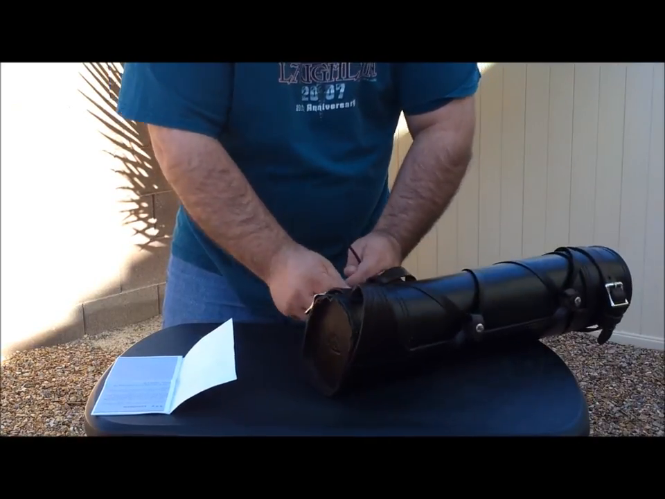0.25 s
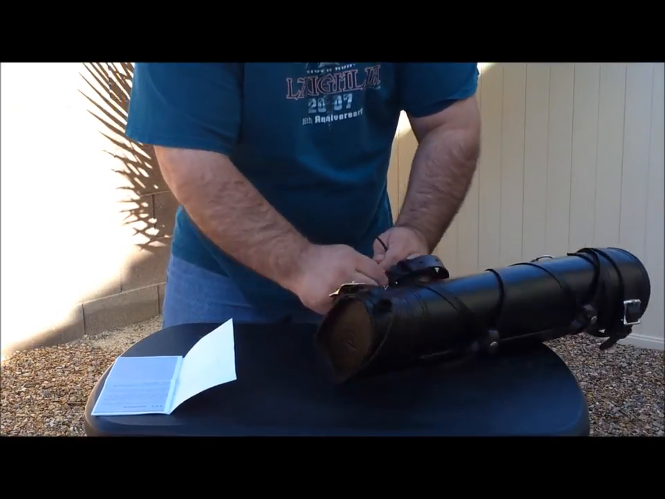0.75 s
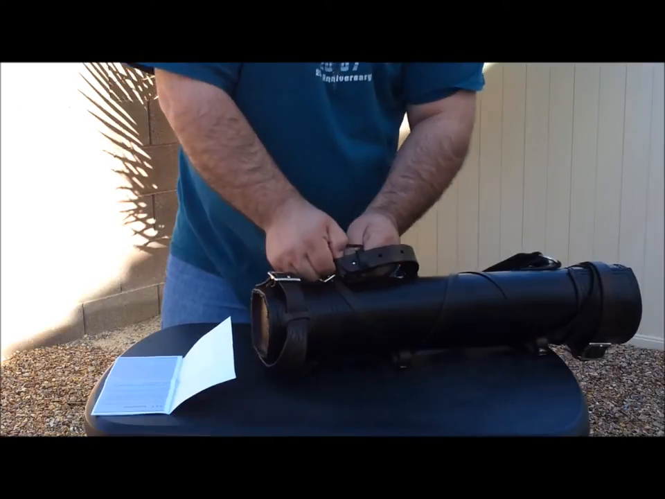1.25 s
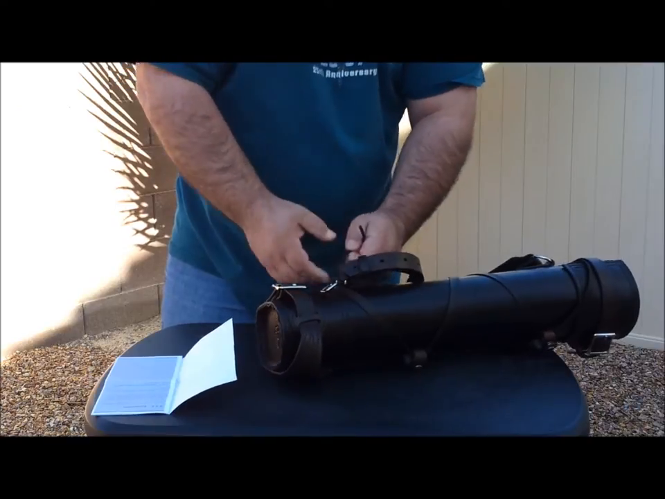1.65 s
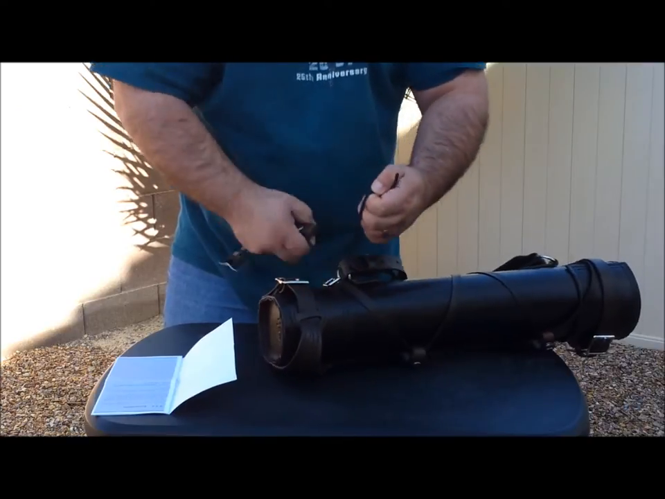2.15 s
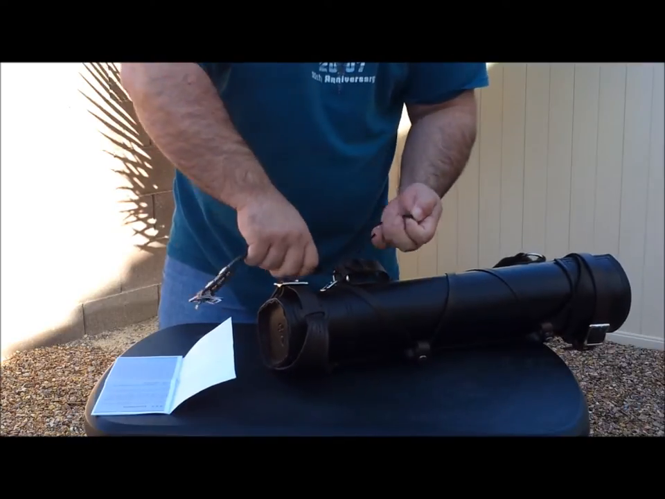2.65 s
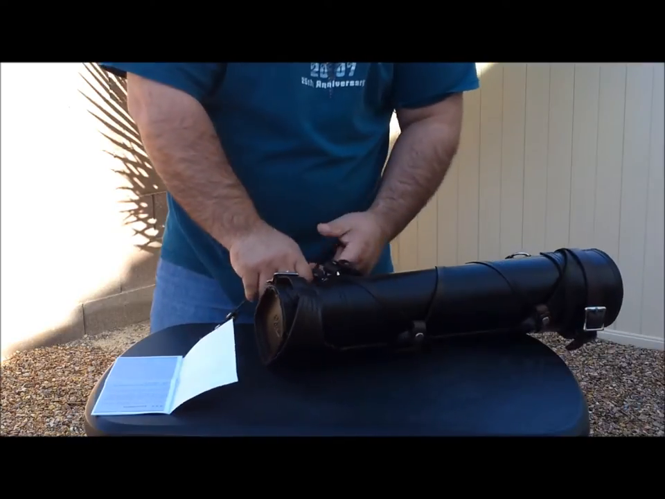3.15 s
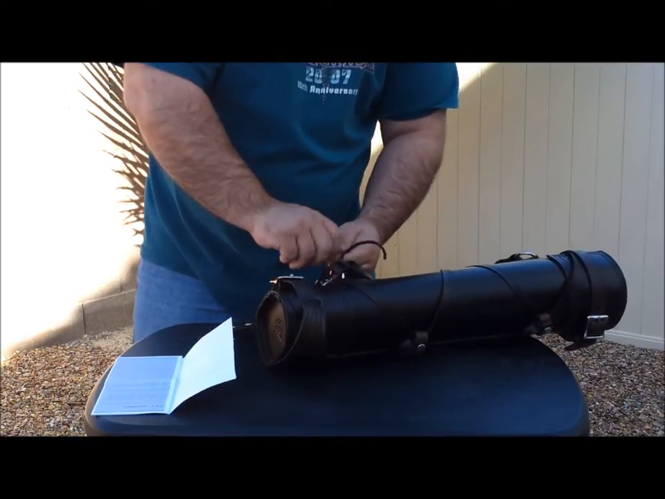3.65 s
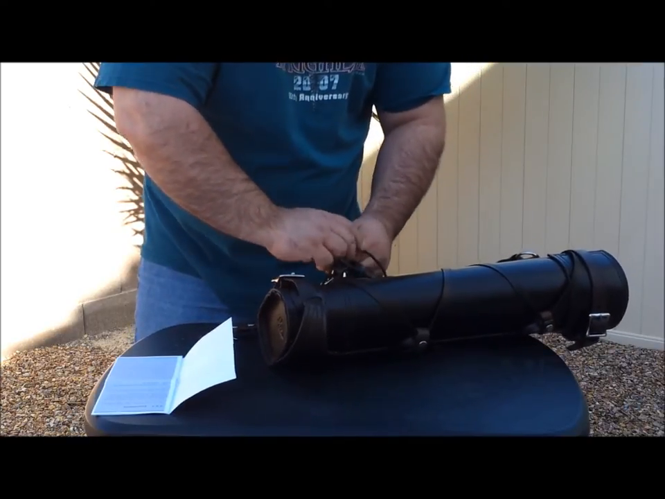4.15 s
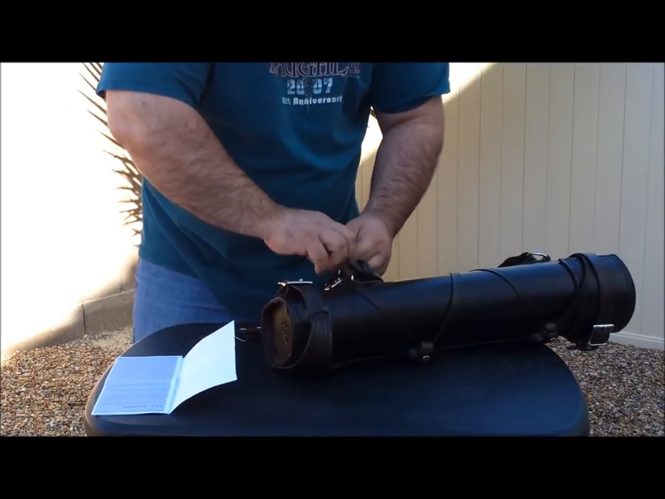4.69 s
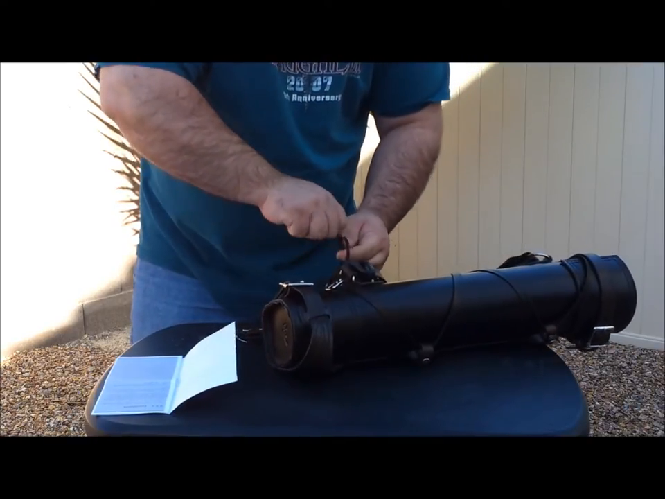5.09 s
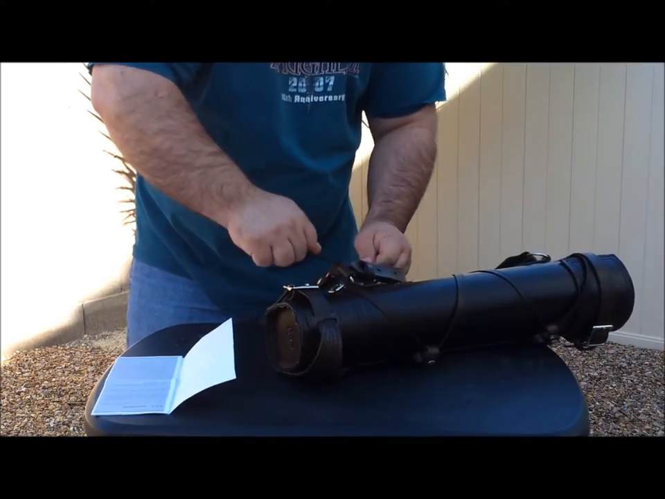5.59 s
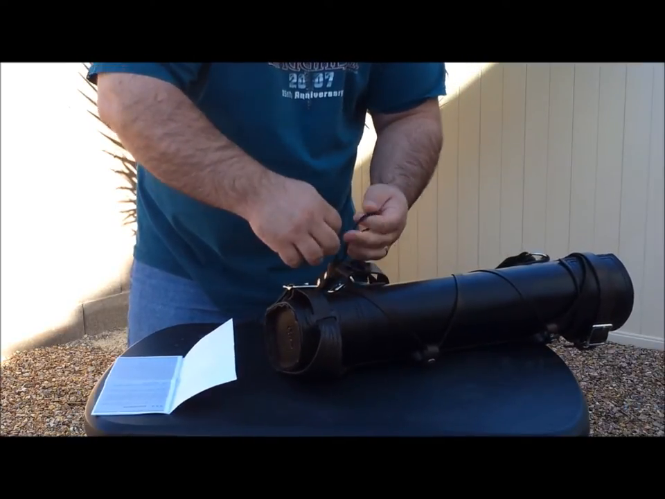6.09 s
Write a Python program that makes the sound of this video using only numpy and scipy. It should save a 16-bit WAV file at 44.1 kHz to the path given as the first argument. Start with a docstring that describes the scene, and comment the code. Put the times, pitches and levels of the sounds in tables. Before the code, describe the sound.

A faint low rumble and fine hiss continue throughout, outdoors. From about 0.3 seconds, hands rub a strap against a leather case in soft, uneven strokes, with a cluster of small ticks around 1 second. Just after 2 seconds a steel buckle knocks on the case with a bright clink, followed by more rustling. Near 3 seconds the buckle drops onto a hollow table with a sharp clatter, then scrapes and tinkles across it in short pulls until about 3.8 seconds. Quieter rubbing follows, with a few ticks around 4.6 seconds. At about 5.3 seconds the leather slides again and the buckle clatters against the case's end cap, then drags with a gritty scrape and light clinks until 5.8 seconds. A last faint rub comes at 6 seconds. The handling sounds close, with a very short echo from a wall.

```python
"""A low outdoor rumble and fine hiss, then leather rustling and ticking as a strap is threaded and tied
on a tube-shaped leather case. Its steel buckle knocks on the case, drops on the table, drags, clinks
and hits the end cap. Sliding makes friction noise; blows ring the modes of the struck part.
A yard wall answers briefly."""
import sys
import numpy as np
from scipy import signal
from scipy.fft import rfft, irfft, next_fast_len
from scipy.io import wavfile
from scipy.ndimage import uniform_filter1d, map_coordinates

SR = 44100
rng = np.random.default_rng(int(sys.argv[2]) if len(sys.argv) > 2 else 0)


def waveform_to_disk(signal):
    """Save audio, clipped to [-1, 1], as 16-bit WAV at the path in sys.argv[1]."""
    frames = np.transpose(np.atleast_2d(signal))
    scaled = np.clip(frames, -1, 1) * 32767
    samples = np.round(scaled).astype(np.int16)
    wavfile.write(sys.argv[1], SR, samples)


N = 279136


def amp(db):
    """Decibels to gain."""
    return 10 ** (np.asarray(db) / 20)


def unit(x):
    """Scale to rms 1."""
    return x / np.sqrt(np.mean(x ** 2) + 1e-20)


def along(points, hz):
    """Interpolate (freq_hz, value) points on a log frequency axis."""
    freq_hz, values = np.transpose(points)
    return np.interp(np.log(hz + 1), np.log(freq_hz), values)


def filtered(x, response):
    """Apply the gain response(hz) to x."""
    n = x.shape[-1]
    size = next_fast_len(n + SR // 8)
    return irfft(rfft(x, size) * response(np.fft.rfftfreq(size, 1 / SR)), size)[..., :n]


def coloured(x, spectrum):
    """Shape x by a spectrum, at rms 1."""
    return unit(filtered(x, lambda hz: amp(along(spectrum, hz))))


def damped(x, decay):
    """Fade each frequency of x with its own t60."""
    hz, t, bins = signal.stft(x, SR, nperseg=128)
    fade = amp(-60 * t / along(decay, hz)[:, None])
    return signal.istft(bins * fade, SR, nperseg=128)[1][..., :x.shape[-1]]


def ring(modes, t, scatter_db, wander):
    """Damped modes struck with scattered strengths; shifting contact blurs their phase."""
    hz, db, t60_s = np.transpose(modes)[:, :, None]
    gains = amp(db + scatter_db * rng.standard_normal(db.shape))
    drift = wander * np.cumsum(rng.standard_normal((len(hz), len(t))), axis=1) / np.sqrt(SR)
    waves = np.sin(2 * np.pi * (hz * t + rng.random(db.shape) + drift)) * amp(-60 * t / t60_s)
    attack = 1 - np.exp(-t / 0.0012)
    return (gains * waves).sum(0) / np.sqrt(np.sum(gains ** 2) / 2) * attack


def rubbed(force, modes):
    """Modes kept ringing by a sliding contact, as loud as the force."""
    response = ring(modes, np.arange(SR // 4) / SR, scatter_db=0, wander=0)
    return unit(signal.fftconvolve(force, response)[:N]) * np.std(force)


def friction(spectrum, slips_per_s, spread_db, smooth):
    """Tiny uneven slips on a bed of smooth sliding noise."""
    slips = (rng.random(N) < slips_per_s / SR) * rng.choice([-1, 1], N)
    sizes = amp(spread_db * rng.standard_normal(N).clip(-2, 2))
    return coloured(unit(slips * sizes) + smooth * rng.standard_normal(N), spectrum)


def strokes(rows, rise_share, fall_share):
    """Friction follows speed as each stroke rises, holds and slows; one gain curve per dB column."""
    power = np.zeros((2, N))
    for start_s, length_s, *levels_db in rows:
        progress = (np.arange(N) / SR - start_s) / length_s
        ramp = np.minimum(progress / rise_share, (1 - progress) / fall_share).clip(0, 1)
        speed = np.sin(np.pi / 2 * ramp)
        power += (amp(levels_db)[:, None] * speed) ** 2
    return np.sqrt(power)


def wobble(knots_per_s):
    """A smooth random curve."""
    return map_coordinates(rng.standard_normal(size=512), [np.arange(N) * knots_per_s / SR], mode="wrap")


def add(track, start_s, sound):
    """Mix a sound into the track."""
    part = track[round(start_s * SR):][:len(sound)]
    part += sound[:len(part)]


# outdoor background: freq_hz, density_db
YARD_SPECTRUM = [(15, -63), (25, -46), (66, 0), (125, -2.5), (231, -2.5), (301, -8.5), (335, -7.5),
                 (462, -15.5), (856, -20), (1240, -26), (2300, -34), (7680, -33.5), (9020, -34.5),
                 (12400, -28), (15000, -40)]


def yard():
    """A steady far rumble and a fine hiss."""
    return amp(-55.5) * coloured(rng.standard_normal(N), YARD_SPECTRUM)


# strokes on leather: start_s, length_s, rub_db, sheen_db
LEATHER_STROKES = [(0.26, 0.2, -63.5, -63.5), (0.48, 0.28, -67, -70), (0.63, 0.47, -60, -64),
                   (0.89, 0.3, -59.5, -60), (1.17, 0.11, -71, -64), (1.27, 0.083, -66, -61.5),
                   (1.38, 0.27, -61, -64), (1.60, 0.36, -66, -68.5), (1.92, .13, -63.5, -58.5),
                   (2.155, .07, -81, -53.5), (2.18, 0.19, -66.5, -61), (2.32, 1, -74, -68.5),
                   (2.60, .07, -81, -64), (2.73, 0.044, -83, -64), (3.78, 0.056, -80, -63),
                   (4.08, .46, -82, -74), (4.52, 0.094, -67.5, -63), (4.66, 0.5, -97, -72),
                   (5.26, 0.23, -63, -55.5), (6.01, 0.065, -71, -67.5)]
# dull friction: freq_hz, density_db
RUB_SPECTRUM = [(200, -12), (500, 10), (750, 4), (900, 4.5), (1100, 7), (1400, 3), (2000, 1.5),
                (3200, -1.5), (6000, -4), (9000, -4), (14000, -4)]
# bright friction: freq_hz, density_db
SHEEN_SPECTRUM = [(4000, -17), (8000, -7), (10500, -1), (12500, 7.5), (14500, -6.5)]


def leather():
    """Hands and strap slide on the case: a dull rub that catches and lets go, and a bright sheen."""
    rub, sheen = strokes(LEATHER_STROKES, rise_share=0.31, fall_share=0.44)
    rub, sheen = np.hypot(rub, amp(-77)), np.hypot(sheen, amp(-73.5))  # fingers never quite rest
    finger_pressure = amp(1.5 * wobble(knots_per_s=23))
    catching = amp(2 * unit(uniform_filter1d(rng.standard_normal(N), size=600)))
    dull = friction(RUB_SPECTRUM, slips_per_s=500, spread_db=3.5, smooth=0.8)
    bright = friction(SHEEN_SPECTRUM, slips_per_s=1200, spread_db=4, smooth=1.1)
    return finger_pressure * (rub * unit(catching * dull) + sheen * bright)


# slips of strap and fittings: start_s, level_db, centre_hz, t60_s
STRAP_SLIPS = [(0.947, -42, 13000, 0.047), (0.963, -35, 13800, 0.014), (0.9638, -45, 5260, 0.012),
               (0.982, -50, 6000, .008), (1.0116, -41.5, 6740, 0.0067), (1.043, -48, 5500, 0.011),
               (1.076, -50, 6000, 0.0088), (1.095, -54, 5900, 0.013), (1.466, -41.5, 12700, 0.012),
               (1.512, -57, 1210, 0.038), (2.1365, -43.5, 13400, 0.015), (2.2755, -44, 5930, 0.011),
               (2.275, -45, 13200, 0.013), (2.8276, -43.5, 12500, 0.0062), (2.829, -58, 6000, 0.0083),
               (3.6272, -52, 1040, 0.04), (3.854, -47.5, 1180, 0.03), (4.5612, -53.5, 4240, 0.034),
               (4.562, -50.5, 11100, 0.055), (4.563, -54.5, 930, 0.068), (4.595, -65, 7000, 0.035),
               (4.6614, -51, 12700, .015), (5.347, -44.5, 4840, 0.031), (5.641, -40, 1740, 0.028)]


def strap_ticks():
    """Each sudden slip is a short noise burst in one broad band."""
    out, t = np.zeros(N), np.arange(SR // 6) / SR
    half_width_oct = 0.55
    for start_s, level_db, centre_hz, t60_s in STRAP_SLIPS:
        noise = rng.standard_normal(len(t))
        band = filtered(noise, lambda hz: 1 / (1 + (np.log2((hz + 1) / centre_hz) / half_width_oct) ** 4))
        add(out, start_s, amp(level_db - 60 * t / t60_s) * unit(band))
    return out


# buckle blows: start_s, part, thud_db, ring_db, crack_db
BLOWS = [(2.0336, "case", -28, -31.5, -35.5), (2.0373, "case", -34, -31.5, -37),
         (2.0472, "case", -37.5, -43.5, -34), (2.9560, "table", -31, -35.5, -39),
         (2.9600, "table", -32.5, -33.5, -42), (2.9705, "table", -30, -43.5, -17.5),
         (2.9840, "table", -34, -39.5, -34), (5.3483, "cap", -49, -50, -48), (5.361, "cap", -36, -49, -57),
         (5.4220, "cap", -37, -39, -46), (5.4325, "cap", -29, -28, -22), (5.4357, "cap", -31, -39, -36),
         (5.4450, "cap", -47, -40, -45)]
# modes of case, table and cap: pitch_hz, relative_db, t60_s
PART_MODES = {"case": [(257, -4, .13), (505, -6, .1), (732, 2, .12), (802, -2, .17), (921, -6, .13),
              (1290, -8, .07), (1720, -14, .07), (2230, -15, .07), (2895, -8, .06), (3520, -16, .08)],
              "table": [(279, 4, .17), (412, -3, .13), (474, -3, .13), (624, -7, .13), (1155, -4, .14),
              (1635, -4, .15), (950, -7, .12), (1290, -8, .1), (1690, -7, .12), (4060, -7, .1),
              (4190, -10, .1)], "cap": [(285, -4, .1), (965, 1, .07), (1150, -2, .08), (1760, -4, .09),
              (1978, -2, .08), (470, -9, .1), (625, -5, .07), (1290, -7, .06), (2130, -1, .06),
              (2450, -5, .06), (4800, -9, .05)]}
# dense, quickly damped resonances per part: freq_hz, density_db
THUD_SPECTRA = {"case": [(130, -35), (250, -15), (360, -11), (700, -1.5), (1200, 1), (2200, -4.5),
                (4500, -9.5), (8000, -19.5), (15000, -19)], "table": [(150, -50), (270, -13), (450, 2),
                (750, -3.5), (1600, -5), (2200, -3.5), (3300, -12.5), (4100, -2), (5600, -22),
                (15000, -27)], "cap": [(150, -42), (280, -17), (550, -2.5), (950, -0.5), (1500, -6),
                (2100, -4), (3000, -17.5), (4300, -10), (6000, -18), (15000, -44)]}
# thud damping: freq_hz, t60_s
THUD_DECAY = [(200, 0.05), (900, 0.066), (3000, 0.039), (12000, 0.048)]
# hard contact: freq_hz, density_db
CRACK_SPECTRUM = [(600, -28), (1800, 3), (3000, -13.5), (4200, 5), (5800, -6.5), (7200, 0), (10000, 0),
                  (13000, 7), (15000, -1)]


def buckle_knocks():
    """A blow is a damped thud, the ring of the struck part and a crack as the hardware chatters out."""
    out, t = np.zeros(N), np.arange(SR // 3) / SR
    contact, chatter = amp(-60 * t / 0.014), amp(-16.5 - 60 * t / 0.11)
    for start_s, part, thud_db, ring_db, crack_db in BLOWS:
        thud = damped(coloured(rng.standard_normal(len(t)), THUD_SPECTRA[part]), THUD_DECAY)
        tone = ring(PART_MODES[part], t, scatter_db=1, wander=1)
        crack = coloured(rng.standard_normal(len(t)), CRACK_SPECTRUM) * (contact + chatter)
        add(out, start_s, amp(thud_db) * thud + amp(ring_db) * tone + amp(crack_db) * crack)
    # small bodies radiate no deep bass
    return signal.sosfilt(signal.butter(6, 205, "highpass", fs=SR, output="sos"), out)


# metal on metal: start_s, level_db, bright_hz, t60_share
STEEL_HITS = [(2.037, -38, 11400, 0.51), (2.96, -35, 10800, 0.48), (2.97, -35, 12400, .5),
              (3.171, -61, 10200, 0.74), (3.281, -52, 11900, 0.4), (3.3103, -38.5, 12000, 0.59),
              (3.325, -46, 10460, 0.31), (5.346, -31.5, 11640, 0.38), (5.352, -46, 9850, 1),
              (5.363, -44, 12350, 0.89), (5.418, -44, 9900, 0.77), (5.435, -32.5, 11400, 0.63),
              (5.573, -61, 9850, 1), (5.619, -53, 9850, 1), (5.660, -52, 9350, 0.88),
              (5.708, -47, 12700, 0.67), (5.724, -47.5, 10600, 0.55)]
# modes of the free buckle: pitch_hz, relative_db, t60_s
STEEL_MODES = [(4150, -5, .12), (8050, -10, .14), (9329, -9, .09), (9852, -3, .18), (10260, -7, .08),
               (10602, -4, .18), (11412, 0, .12), (11860, -10, .1), (12040, -11, .09), (12312, -2, .14),
               (12463, -6, .1), (12950, -9, .08)]


def buckle_clinks():
    """The contact point decides which steel modes ring most; leather and fingers damp them."""
    out, t = np.zeros(N), np.arange(SR // 3) / SR
    pitch_hz, mode_db, t60_s = np.transpose(STEEL_MODES)
    for start_s, level_db, bright_hz, t60_share in STEEL_HITS:
        boost_db = 14 / (1 + ((pitch_hz - bright_hz) / 450) ** 2)
        modes = np.transpose([pitch_hz, mode_db + boost_db, t60_share * t60_s])
        tone = ring(modes, t, scatter_db=1.5, wander=1.5)
        touch = coloured(rng.standard_normal(len(t)), SHEEN_SPECTRUM) * amp(-14 - 60 * t / 0.1)
        add(out, start_s, amp(level_db) * (tone + touch))
    return out


# pulls across the table: start_s, length_s, scrape_db, grit_db
PULLS = [(3.13, 0.21, -55.5, -62.5), (3.39, 0.068, -57, -68), (3.48, .14, -60, -75),
         (3.60, 0.082, -54, -58.5), (3.675, 0.083, -51, -61), (4.12, 0.35, -67.5, -82),
         (5.44, 0.15, -56, -55.5), (5.565, .17, -56, -48.5), (5.70, 0.095, -56.5, -57.5)]
# low judder: freq_hz, density_db
SCRAPE_SPECTRUM = [(150, -26), (300, -1.5), (500, 8.5), (720, 9.5), (900, 13.5), (1280, -5), (1480, -37),
                   (1700, 1), (2200, -25), (3200, -14.5)]
# gritty friction: freq_hz, density_db
GRIT_SPECTRUM = [(700, -44), (1200, 16.5), (1750, 13.5), (2300, 9), (3300, 3), (4300, 4.5), (6500, -11.5),
                 (9000, -3.5), (12500, 1), (15000, -29)]


def buckle_drag():
    """The buckle judders and grates over the hollow table; its loose tongue tinkles on its frame."""
    jolts_per_s = 120
    scrape, grit = strokes(PULLS, rise_share=0.5, fall_share=0.49)
    judder = scrape * friction(SCRAPE_SPECTRUM, slips_per_s=600, spread_db=2.5, smooth=0.7)
    grains = grit * friction(GRIT_SPECTRUM, slips_per_s=900, spread_db=2.5, smooth=1)
    hollow = rubbed(judder, PART_MODES["table"])
    jolts = (rng.random(N) < jolts_per_s / SR) * rng.standard_normal(N)
    tinkles = rubbed(grit * jolts, STEEL_MODES)
    return amp(-0.5) * judder + amp(-3) * hollow + grains + amp(-8) * tinkles


# yard reverberation: freq_hz, t60_s
WALL_DECAY = [(200, 0.1), (1500, 0.42), (5000, 0.36), (13000, 0.14)]


def wall_echo(x, delay_s=0.008):
    """Ground and wall scatter a short tail."""
    tail = damped(rng.standard_normal(SR // 2), WALL_DECAY)
    delayed = np.pad(x, (round(delay_s * SR), 0))
    return signal.fftconvolve(delayed, tail / np.linalg.norm(tail))[:N]


def early_reflections(x, delay_s=0.002, t60_s=0.04):
    """Reflections off table and ground reach the two ears differently."""
    t = np.arange(SR // 30) / SR
    paths = rng.standard_normal(len(t)) * amp(-60 * t / t60_s) * (t > delay_s)
    side = amp(-19) * signal.fftconvolve(x, paths / np.linalg.norm(paths))[:N]
    return np.array([side, -side])


def scene():
    """Everything is centred; only the knocks spread a little in stereo."""
    knocks = buckle_knocks()
    handling = leather() + strap_ticks() + buckle_drag() + knocks + buckle_clinks()
    return handling + amp(-12) * wall_echo(handling) + yard() + early_reflections(knocks)


def record(dry):
    """A steep low-pass removes the highest treble."""
    cutoff_hz, edge_hz = 14750, 300
    return filtered(dry, lambda hz: np.clip((cutoff_hz - hz) / edge_hz + 0.5, 0, 1))


dry = scene()
out = record(dry)
waveform_to_disk(out)
```